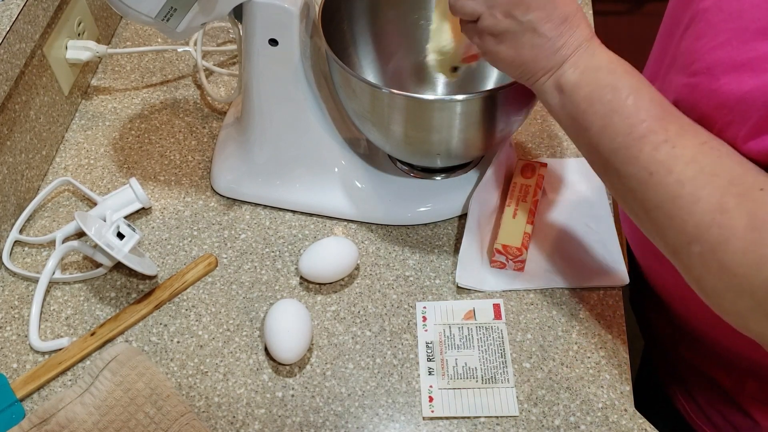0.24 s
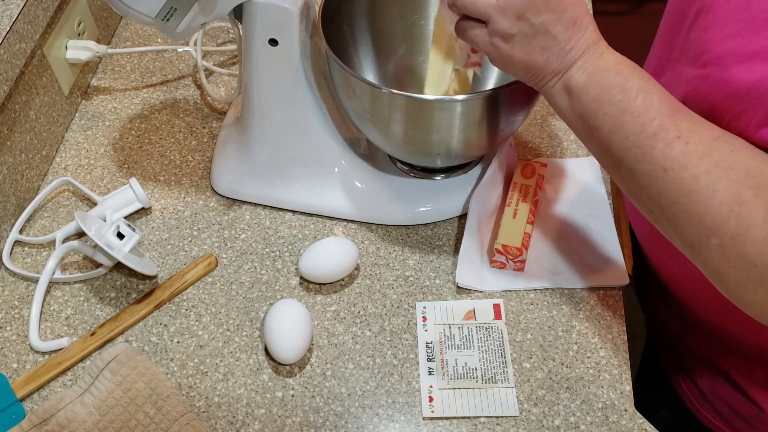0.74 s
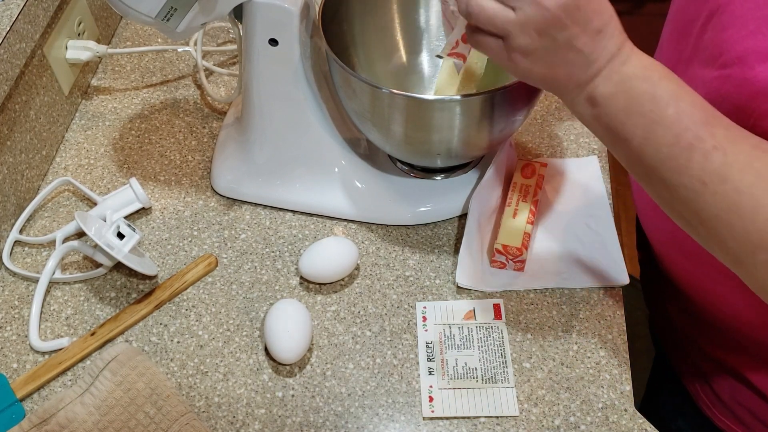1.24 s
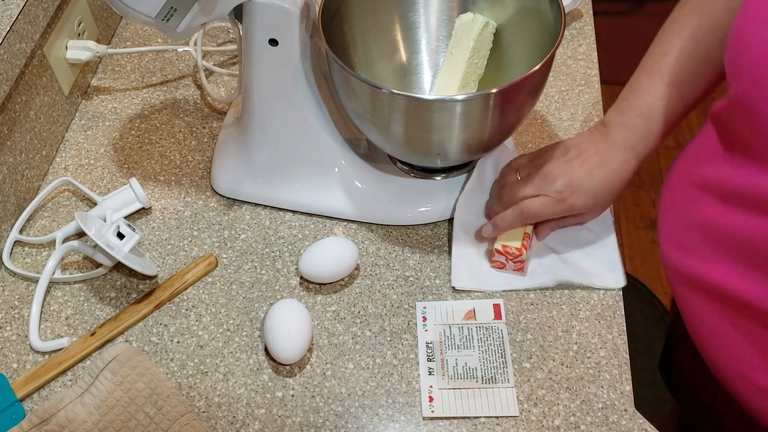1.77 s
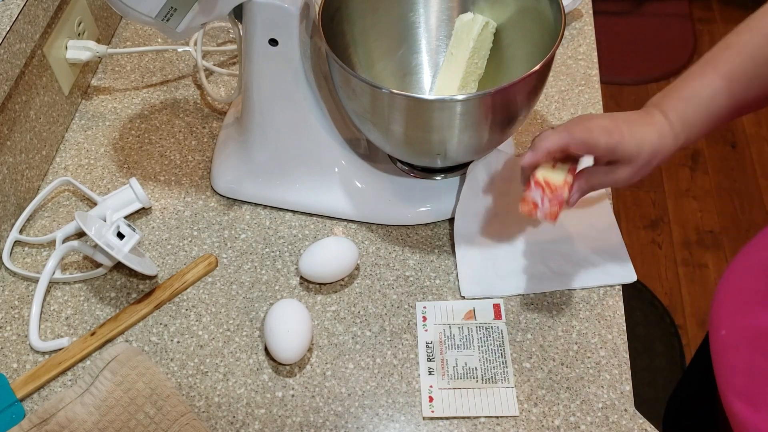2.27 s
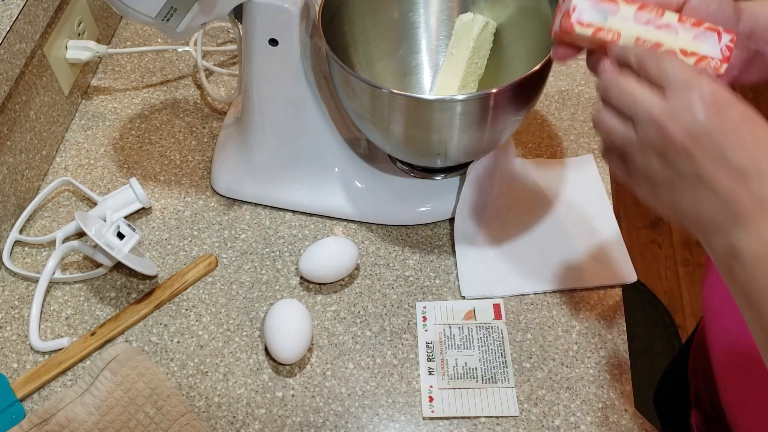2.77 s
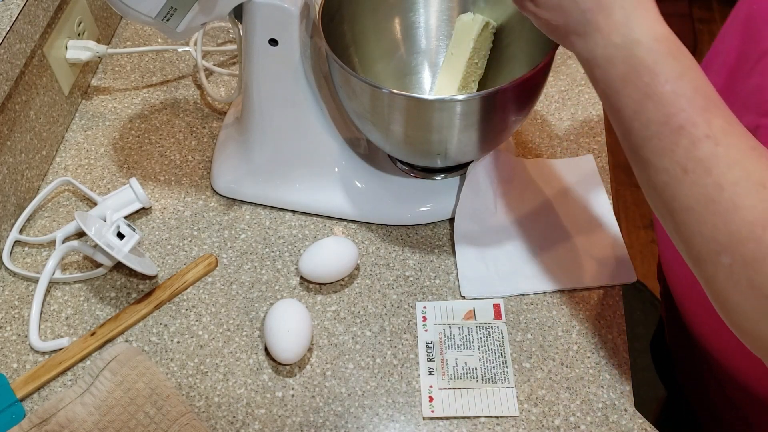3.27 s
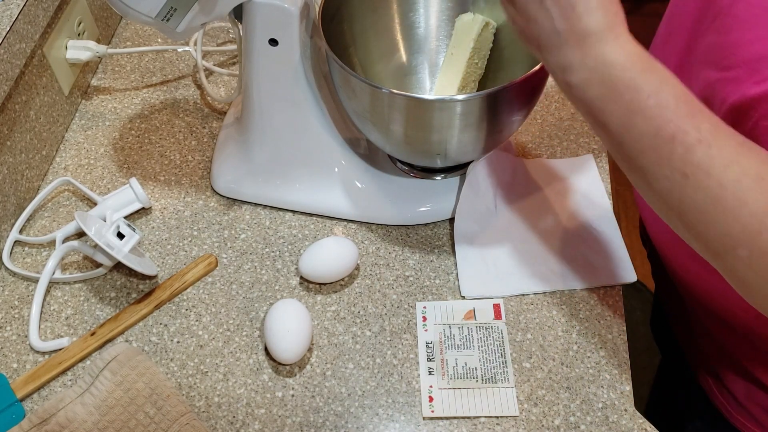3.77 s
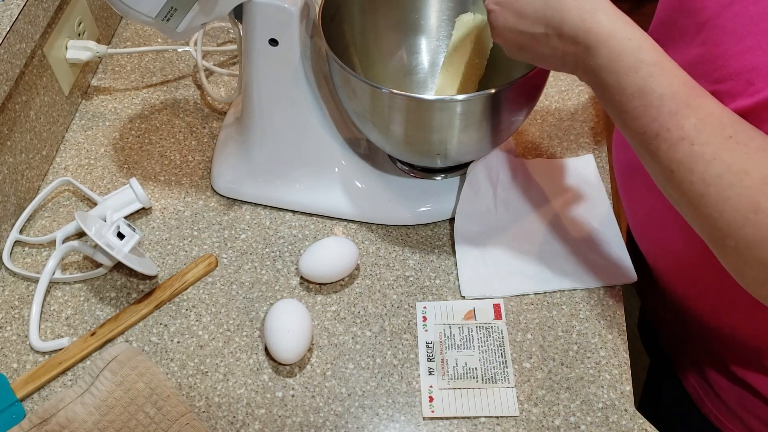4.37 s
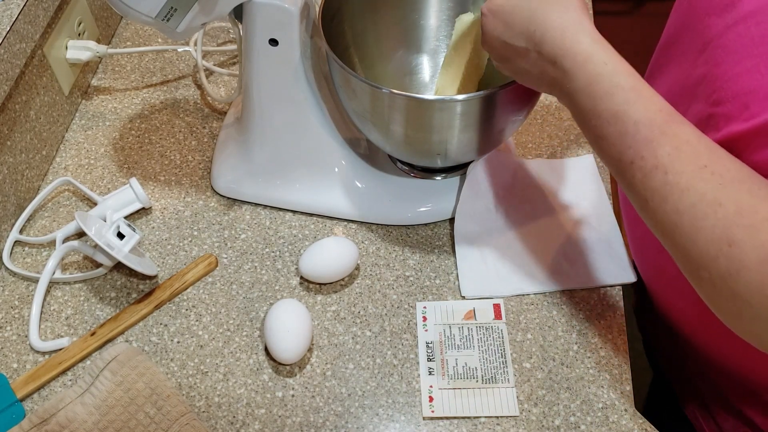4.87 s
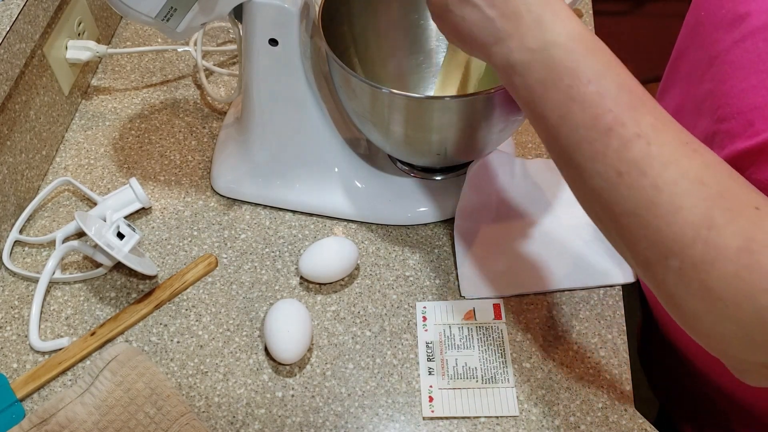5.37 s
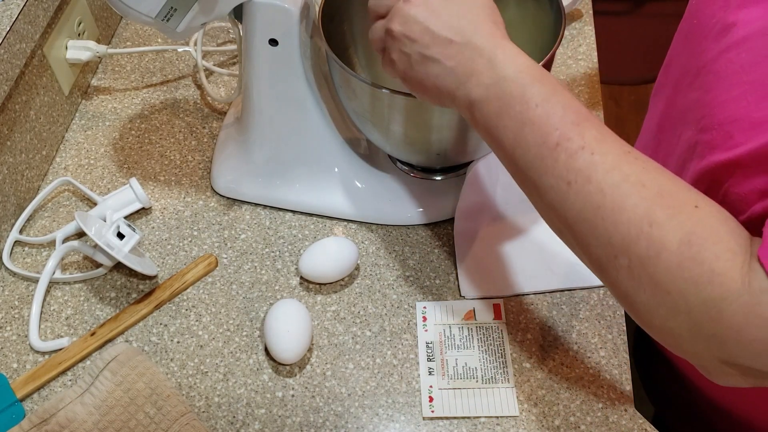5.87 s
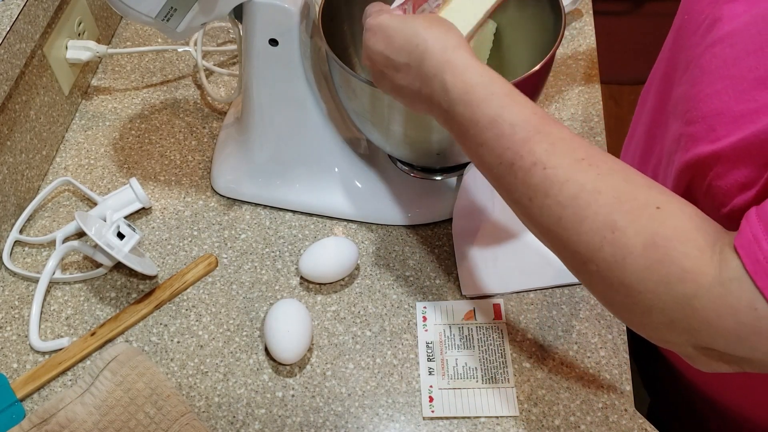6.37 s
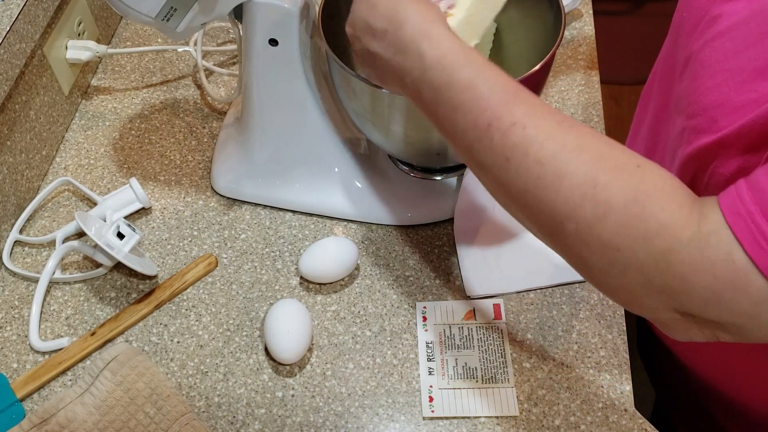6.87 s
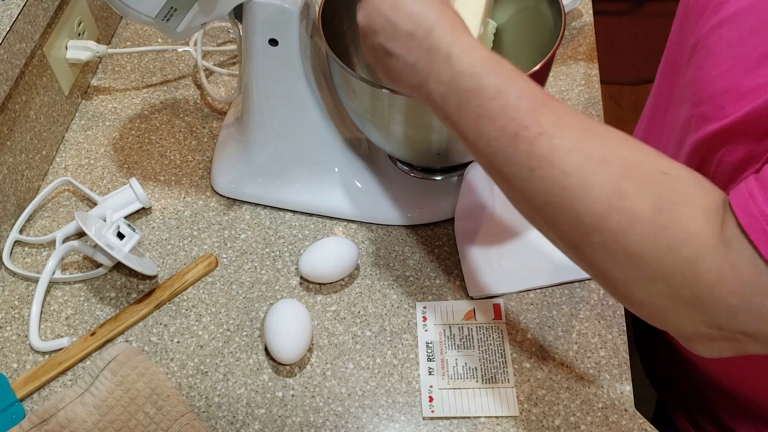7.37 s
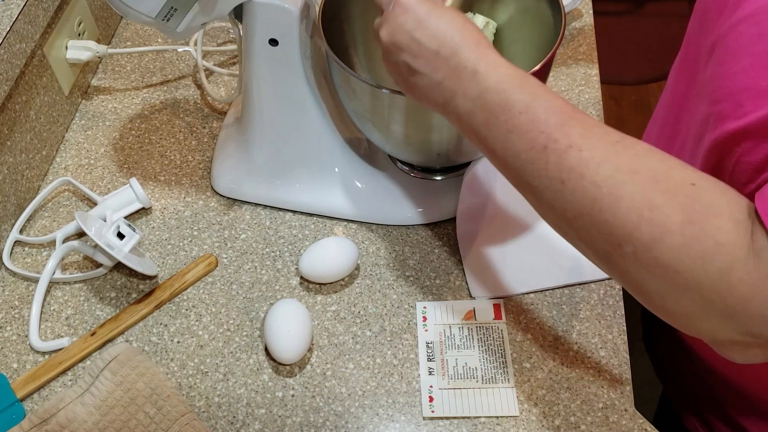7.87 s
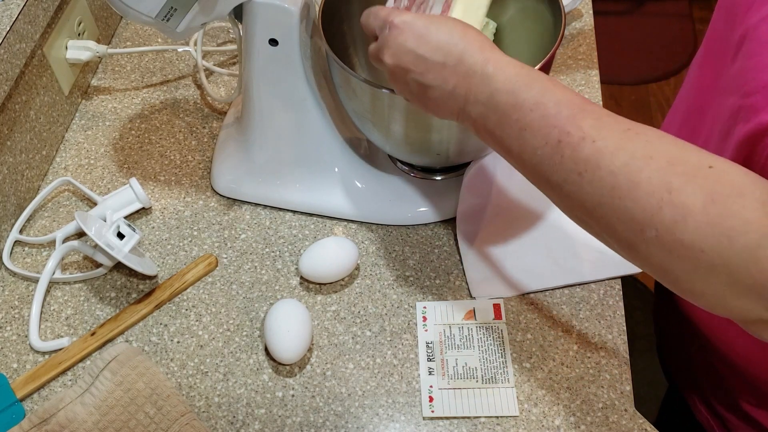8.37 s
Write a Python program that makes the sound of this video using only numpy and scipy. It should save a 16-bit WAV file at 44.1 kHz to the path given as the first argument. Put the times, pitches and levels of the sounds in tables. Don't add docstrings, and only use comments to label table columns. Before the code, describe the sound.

Stiff butter wrapper crackles in bursts, pauses, then snaps sharply again over a metal bowl, above faint fridge hum and room hiss.

```python
import sys
import numpy as np
from scipy import signal
from scipy.io import wavfile
from scipy.ndimage import uniform_filter1d

SR = 44100
rng = np.random.default_rng(int(sys.argv[2]) if len(sys.argv) > 2 else 0)


def gain_from_decibels(decibels):
    exponent = np.asarray(decibels, float) / 20
    return 10 ** exponent


def inscribe(sig):
    pcm = np.round(np.clip(np.atleast_2d(sig).T, -1, 1) * 32767)
    wavfile.write(sys.argv[1], SR, pcm.astype(np.int16))


N = 380583
EDGES_HZ = 22 * 2 ** np.arange(0, 10, .3)

# (frequency [Hz], correlation [-1..1])
LIKENESS = [(60, 0.76), (180, 0.98), (550, 0.62), (1650, 0.03), (4970, 0), (15000, -0.0)]
# (time [s], left-right [dB])
HAND_PAN = [
    (0, 2.5),
    (1.0, 2.5),
    (2.2, 0),
    (4.3, 1.5),
    (8.6, 1),
]


def in_time(rows):
    s, *columns = np.transpose(rows)
    return [np.interp(np.arange(N) / SR, s, c) for c in columns]


def at_time(rows, s):
    return np.interp(s, *np.transpose(rows))


def at_hz(points, hz):
    return np.interp(np.log(hz), np.log(np.array(points)[:, 0] + 1), np.array(points)[:, 1])


def rms_one(x):
    return x / np.sqrt(np.mean(x ** 2) + 1e-20)


def peak_one(x):
    return x / (np.max(np.abs(np.mean(x, axis=0))) + 1e-12)


def pan(left_right_db):
    return gain_from_decibels(left_right_db * np.array([[.5], [-.5]]))


def drift(rate_hz):
    r = np.exp(-80 * np.pi * rate_hz / SR)
    slow = signal.lfilter([1], [1, -2 * r, r * r], rng.standard_normal(N // 40 + 2002))[2000:]
    return np.interp(np.arange(N) / 40, np.arange(len(slow)), rms_one(slow))


def band(x, low_hz, high_hz, order=2):
    edges = [low_hz, min(high_hz, .45 * SR)]
    return signal.sosfilt(signal.butter(order, edges, "band", fs=SR, output="sos"), x)


def resonate(x, hz, width_hz):
    r = np.exp(-np.pi * width_hz / SR)
    zeros = np.array([1, 0, -1]) * (1 - r * r) / 2
    return signal.lfilter(zeros, [1, -2 * r * np.cos(2 * np.pi * hz / SR), r * r], x)


def resonate_twice(x, hz, width_hz):
    return resonate(resonate(x, hz, width_hz), hz, width_hz)


def spread(mid, side, hz):
    alike = np.clip(at_hz(LIKENESS, hz), -1, 1)
    return np.sqrt(1 + alike) * mid + np.sqrt(1 - alike) * side * [[1], [-1]]


def colour(mid_side, spectrum, low_hz, high_hz, patchy_db, tilted):
    # (frequency [Hz], left-right [dB])
    balance = [(60, 0.5), (180, -3), (550, 13), (1650, 4.5), (4970, 4.5), (15000, -5.5)]
    out = 0
    for k, (low, high) in enumerate(zip(EDGES_HZ, EDGES_HZ[1:])):
        hz = np.sqrt(low * high)
        if low_hz <= hz < high_hz:
            mid, side = band(mid_side[k % 2], low, high)
            gain = gain_from_decibels(at_hz(spectrum, hz) + patchy_db * drift(14.2))
            out = out + gain * spread(mid, side, hz) * pan(tilted * at_hz(balance, hz))
    return out / np.sqrt(np.mean(np.mean(out, axis=0) ** 2))


def room_tone():
    # (frequency [Hz], density [dB per Hz])
    air_spectrum = [(13, -50), (22, -17.5), (70, -7), (97, -4), (121, -3.5), (143, -6.5), (169, -16),
                    (255, -10), (550, -31), (1220, -36.5), (2950, -38), (5870, -47.5), (6730, -39),
                    (8390, -49.5), (15800, -38.5)]
    noise = rng.standard_normal((2, 2, N))
    return gain_from_decibels(-61.5) * colour(noise, air_spectrum, 26, 20000, patchy_db=3.0, tilted=0.44)


def refrigerator():
    # (time [s], level [dB])
    motor_level = [(0.0, -67.5), (1.68, -60.5), (2.6, -76), (5.38, -63.5), (5.84, -50), (6.73, -67),
                   (7.04, -60.5), (8.63, -63)]
    motor_db, = in_time(motor_level)
    t = np.arange(N) / SR
    beat_s, dip_s, depth = 1.08, 4.545, 0.22
    beat = 1 - depth * np.cos(2 * np.pi * (t - dip_s) / beat_s)
    hum_db = -49.5 + 0.46 * drift(2.7)
    hum = beat * gain_from_decibels(hum_db) * np.sin(2 * np.pi * 120.1 * t + .3 * drift(1.2))
    motor = gain_from_decibels(motor_db - 1.5) * rms_one(resonate_twice(rng.standard_normal(N), 76.8, 12))
    mains = gain_from_decibels(-67.5) * rms_one(resonate_twice(rng.standard_normal(N), 59.9, 6.5))
    return (hum + motor + mains) * pan(2.2)


def in_bowl(x, ring_db, pitch=1, scatter_db=np.zeros(6)):
    # (frequency [Hz], width [Hz], level [dB])
    air_modes = [(222, 360, -10), (342, 19, -1), (431, 33, -5.5), (496.8, 24, 8), (791, 88, -8.5),
                 (1154, 39, -4.5)]
    ring = 0
    for k, (hz, width_hz, db) in enumerate(air_modes):
        ring = ring + (-1) ** k * gain_from_decibels(ring_db + db + scatter_db[k]) * resonate(x, pitch * hz, width_hz)
    return x + ring


def pulls():
    # (peak time [s], 20 dB swell [s], level [dB], brightness [dB], weight in bowl [dB])
    first = [(.005, 20, -59, -5, -1), (0.198, 0.28, -53, -8, -6), (.382, 0.5, -62, -7, 6),
             (.673, -5, -85, 19, 3), (.723, 0.06, -48.5, -7.5, -0.5), (0.871, -1.2, -60.5, -5.5, 1.5),
             (1.249, -1.8, -74.5, 1.5, 5.5), (1.476, .004, -74, -10, 15), (1.54, .03, -77, -8, 14),
             (1.79, 0.5, -86.5, 12, 7), (2.08, 0.35, -78, 5, 3.5)]
    lift = [
        (2.226, .003, -48, -6, -7),
        (2.27, .022, -53, -4, -8),
        (2.33, .03, -54, -4, -11),
        (3.132, .004, -96, 23, 8),
        (3.25, .025, -92, 27, 6),
        (3.425, .006, -62, -6, -9),
        (3.45, .03, -64, 15, -15),
        (3.577, .02, -56, -2, -18),
        (3.766, .12, -54.5, 0, -8),
        (3.909, .5, -56.5, -4, -8),
    ]
    unfold = [(4.2, 0.54, -66, 1, -23), (4.301, 0.3753, -50.5, 0, -7), (4.501, -0.15, -55.5, -8, -13),
              (4.62, 0.6, -65.5, -3, -7), (4.798, 0.08, -54.5, 3, -7.5), (4.965, 0.16, -42.5, -7, -12),
              (5.154, 0.01, -54, 2.5, -9), (5.37, 0, -51.5, -5, -7), (5.6, 0.38, -59.5, 3, -11),
              (5.76, 0.5, -78, 8.5, 7.5)]
    peel = [(5.914, 0, -53, -21, -2), (6.054, -0.06, -51.5, -1, -9), (6.287, 0.16, -46.5, -2, -6.5),
            (6.46, 1.4, -66.5, 2, -16), (6.64, 0.2, -55.5, -3.5, -0.5), (6.78, 0, -70, 0.5, 4),
            (6.943, 0.07, -46.5, -5.5, -6), (7.049, 0.02, -58, -14, -7), (7.16, 0.34, -52.5, -3, -1),
            (7.276, 0.66, -56, -2.5, -2.5), (7.45, 2, -74.5, -12, 10), (7.56, 0.3, -60.5, -2, -21),
            (7.699, 0.38, -61, -6.5, 4.5), (7.776, 0.11, -52, -2.5, 1), (7.915, 0.12, -48, -9, -3),
            (8.244, 0.06, -49.5, -3, -2.5), (8.406, 0.38, -53.5, -9, -4.5), (8.58, 0.53, -55, -1, -1)]
    settle_rates = [97, 132, 144, 190]
    s, swell_s, db, bright_db, weight_db = np.transpose(first + lift + unfold + peel)[:, :, None]
    steps = np.arange(0, N + 64, 64)
    age = steps / SR - s
    swell_s = np.maximum(swell_s, .003)
    hiss_db = db + 1.55 * bright_db - 2.5
    levels = []
    for peak_db, settle in zip([db + weight_db, db, db + bright_db, hiss_db], settle_rates):
        shape_db = np.where(age < 0, 20 * age / swell_s, -settle * age)
        power = np.sum(gain_from_decibels(np.maximum(peak_db + shape_db, -130)) ** 2, axis=0)
        levels.append(np.interp(np.arange(N), steps, 10 * np.log10(power)))
    return levels


def crackle(body_db, rustle_db, crisp_db):
    pops_per_s = 600. * gain_from_decibels(5 * np.minimum(drift(20), 1)) * np.clip((rustle_db + 71) / 12, 0, 1)
    born = rng.random(N) < pops_per_s / SR
    sizes = born * gain_from_decibels(2.0 * np.minimum(rng.exponential(1, N), 3)) * rng.choice([-1, 1], N)
    ports = gain_from_decibels(3.4 * np.clip(rng.standard_normal(N), -1, 1) * np.array([[1], [-1]]))
    rough = rng.standard_normal(N)
    pitches_hz, dealt, out = np.geomspace(450, 7000, 12), rng.integers(0, 12, N), 0
    for k, hz in enumerate(pitches_hz):
        level_db = body_db if hz < 1000 else rustle_db if hz < 3500 else crisp_db
        puffs = signal.lfilter([1], [1, -.98], sizes * ports * (dealt == k) + 1e-18)
        out = out + gain_from_decibels(level_db) * rms_one(band(rough * puffs, 0.67 * hz, 1.48 * hz))
    return out


def rustle():
    # (frequency [Hz], density [dB per Hz])
    paper_spectrum = [(120, -40), (200, -6), (386, -16), (481, -6), (668, -15.5), (760, -7), (1040, -12.5),
                      (1360, -11.5), (4080, -15), (6450, -12.5), (8800, -15), (15800, -8)]
    body_db, rustle_db, crisp_db, hiss_db = pulls()
    grains = rng.standard_normal((2, 2, N)) * gain_from_decibels(2.73 * drift(50))
    flicker_db = 3.0
    body = in_bowl(colour(grains, paper_spectrum, 220, 1250, flicker_db, tilted=0.29), ring_db=-5.0)
    sheet = colour(grains, paper_spectrum, 1250, 3500, flicker_db, tilted=0.56)
    crisp = colour(grains, paper_spectrum, 3500, 7800, flicker_db, tilted=0.95)
    hiss = colour(grains, paper_spectrum, 7800, 20000, flicker_db, tilted=0.8)
    friction = gain_from_decibels(body_db - 4.0) * body + gain_from_decibels(rustle_db - 6.0) * sheet
    friction = friction + gain_from_decibels(crisp_db - 2.5) * crisp + gain_from_decibels(hiss_db + 1.5) * hiss
    return friction + gain_from_decibels(-18) * crackle(body_db, rustle_db, crisp_db)


def across_bowl(x):
    # (frequency [Hz], width [Hz], level [dB]); empty bowl
    empty_modes = [(1090, 80, 5), (1750, 230, 2), (2260, 150, 2.5), (2700, 52, -4)]
    full_modes = [(1266, 41, -9), (1980, 120, -8.5), (2850, 50, -7)]
    t = np.arange(N) / SR
    empty_until_s, over_bowl_from_s = 1.1, 4.2
    in_empty = np.clip(10 * (empty_until_s - t), 0, 1)
    in_full = np.clip(10 * (t - over_bowl_from_s), 0, 1)
    out = x
    for share, modes in [(in_empty, empty_modes), (in_full, full_modes)]:
        for hz, width_hz, db in modes:
            out = out + gain_from_decibels(db) * resonate(x * share + 1e-18, hz, width_hz)
    return out


def snaps():
    # (time [s], peak [dB], crease pitch [Hz], bowl boom [dB rel], treble [dB rel])
    first = [(0.0602, -35, 4130, -8.5, -26), (0.1807, -29.5, 1720, -6, -11),
             (0.1932, -34.5, 1610, -33, -22), (0.3062, -30.5, 1750, -27, -12),
             (0.368, -27.5, 1730, -10, -10), (0.3775, -25, 1810, -59.5, -6.5),
             (0.4581, -38.5, 2320, -12, -23), (0.5238, -45, 1020, 1.5, -17), (0.5827, -36, 1750, -21, -15),
             (0.614, -23.5, 5830, -18, -8.5), (0.7061, -26, 2940, -9.5, -8), (0.7147, -25.5, 4450, -13, -4),
             (0.7377, -31, 2230, -14, -20.5), (0.7575, -40, 1580, -5, -27.5), (0.887, -43.5, 5700, -9, -6),
             (0.9259, -43, 1700, -25, -12), (0.9491, -44, 1650, -9, -11)]
    lift = [
        (2.2258, -31.5, 6560, -26, -0.5),
        (2.245, -34.5, 3620, -24, 2),
        (2.268, -36.5, 2000, -16, 12.5),
        (2.325, -28, 3200, -30, -3.5),
        (3.5681, -20, 7100, -32, 4),
        (3.6486, -37, 888, -27, -1),
        (3.69, -29.5, 5470, -35, -6.5),
        (3.755, -27.5, 2700, -42, -40),
        (3.8467, -38, 2850, -22, -24),
    ]
    unfold = [(4.2813, -30, 1440, -8, -21), (4.453, -24.5, 4540, -35.5, -11),
              (4.4885, -28.5, 2870, -12.5, -6), (4.7155, -39, 1589, -20, -21.5), (4.772, -32, 7300, -18, 7),
              (4.8012, -28.5, 3220, -15, -21), (4.8129, -26, 5050, -18, -1), (4.8415, -29, 1520, -9, -12),
              (4.886, -25.5, 2730, -15, -7), (4.935, -23.5, 1400, -12, -11), (4.9576, -26.5, 4900, -3, -5),
              (5.0094, -23.5, 2260, -21, -15), (5.039, -36.5, 1310, 2.5, -18.5),
              (5.149, -25, 1380, -20, -5.5), (5.359, -17.5, 2600, -20.5, -1),
              (5.372, -22, 5740, -17.5, -12), (5.525, -34.5, 3260, -33, 6), (5.5826, -31.5, 5900, -41, -7),
              (5.633, -34.5, 4700, -23, 3)]
    peel = [(5.889, -40.5, 1000, -5, -28), (5.9087, -40, 1740, -3.5, -11), (6.0418, -32.5, 2940, -17, -8),
            (6.19, -32.5, 3380, -11, -27), (6.2673, -22.5, 1960, -12, -3), (6.563, -37, 1410, -2.5, -15.5),
            (6.6095, -30.5, 1330, -11.5, -6), (6.636, -25, 1370, -4.5, -11), (6.649, -28, 2980, -37, -6.5),
            (6.7303, -31, 2450, -7, -10), (6.75, -33, 1130, -4, -23), (6.8462, -31.5, 2770, -6.5, -13.5),
            (6.9339, -24, 1490, -17.5, -13), (6.9513, -22, 5000, -16, 2), (7.0452, -19.5, 1460, -9, -3),
            (7.1158, -20, 3460, -15, -20), (7.1323, -26, 1180, -26, -5.5), (7.1956, -22.5, 7200, -12, -4.5),
            (7.2018, -28, 3160, -34, -2), (7.2626, -19.5, 5920, -48, -8), (7.2722, -36, 6160, -34, -22),
            (7.354, -26.5, 3620, -11, -5.5)]
    push = [(7.418, -43.5, 1480, -3, -14), (7.5383, -34, 2540, -27, -12), (7.5938, -37.5, 1850, -18, -10),
            (7.752, -42, 1400, -19, -17), (7.7725, -21, 3050, -9.5, -3.5), (7.9062, -18, 6070, -21.5, -2.5),
            (8.164, -41.5, 1490, -6.5, -23), (8.18, -37.5, 4900, -12, -11),
            (8.2417, -28.5, 1960, -15, -4.5), (8.3055, -27.5, 1370, -4, -10),
            (8.3857, -26, 1720, -18, -6.5), (8.4135, -29, 3730, -10.5, -3.5),
            (8.4269, -31.5, 2060, -11, -7), (8.4902, -37.5, 4670, -15, -6),
            (8.5261, -31.5, 2850, -7.5, -18), (8.537, -34.5, 2820, -11, -13)]
    crisp_times = [3.568, 4.453, 4.772, 4.813, 5.359, 5.372, 5.583, 5.633, 6.951, 7.116, 7.132, 7.354,
                   7.772, 7.906]
    # (time [s], pitch factor)
    bowl_pitch = [(0, 1.05), (4.3, 0.98), (4.95, 0.98), (5.4, 1.01), (6.6, 1.007), (7.1, 1.001),
                  (7.8, 0.97), (8.63, 1.01)]
    rows = first + lift + unfold + peel + push
    length, lead = 4096, 500
    out = np.zeros((2, N + length))
    t = (np.arange(length) - lead) / SR
    draws, chances = rng.standard_normal((len(rows), 3, length)), rng.random((len(rows), 3))
    for (s, db, hz, boom_db, treble_db), draw, (span, creak, place) in zip(rows, draws, chances):
        crisp = np.min(np.abs(np.array(crisp_times) - s)) < .004
        creak, span = (creak / 4, span / 2) if crisp else (1 - creak / 4, span)
        before = (.12 + .6 * creak ** 3) * np.exp(t / 0.0014)
        burst = np.where(t < 0, before, np.exp(-t / (0.0016 + 0.002 * span)))
        slips = (draw[0] + 0.9 * draw[1:]) * burst
        slips[[0, 1], lead + np.array([0, round(8.0 * span)])] += 14.1 * (1 - creak)
        panel = band(slips, np.clip(0.45 * hz, 700, 4000), 5880)
        panel = panel + gain_from_decibels(4.5) * resonate_twice(slips, hz, 0.42 * hz)
        boom = in_bowl(draw[0] * burst, ring_db=22, pitch=at_time(bowl_pitch, s), scatter_db=4 * draw[1])
        boom = band(boom, 138, 1530) * np.ones((2, 1))
        treble = band(slips, 8950, 15930) * pan(-7)
        sound = peak_one(panel) * pan(2.4) + gain_from_decibels(boom_db) * peak_one(boom)
        sound = sound + gain_from_decibels(treble_db) * peak_one(treble)
        pan_db = at_time(HAND_PAN, s) + 1.5 * (2 * place - 1)
        at = max(round(s * SR) - lead, 0)
        out[:, at:at + length] += gain_from_decibels(db - 1.5) * sound * pan(pan_db)
    return out[:, :N]


def ticks():
    # (time [s], peak [dB], pitch [Hz], treble [dB rel]); first stick and lift
    early = [(0.079, -39, 1360, -34), (0.128, -51, 1180, -31), (0.186, -28.5, 1040, -30),
             (0.209, -30, 1540, -27), (0.236, -33.5, 930, -22), (0.274, -34.5, 867, -14),
             (0.297, -38, 1750, -27), (0.322, -39, 1560, -33), (0.546, -43, 1090, -29),
             (0.659, -47, 1100, -19), (0.872, -47, 1680, -24), (2.233, -24.5, 960, -4),
             (2.312, -33, 3380, -18), (3.374, -53, 6340, -4), (3.451, -36, 6980, 10),
             (3.502, -37, 6710, -20), (3.545, -45, 3500, -12), (3.697, -33, 6100, -22),
             (3.712, -40, 3080, -22), (3.761, -29.5, 864, -13), (3.794, -38, 3110, -13),
             (3.854, -37, 2930, -28), (3.878, -34, 1190, -17), (3.928, -39.5, 3520, -21),
             (4.271, -33, 746, -15), (4.310, -30.5, 5400, -3)]
    late = [(4.508, -34.5, 4820, -24), (4.514, -36, 4570, -4), (4.626, -43, 3070, -22),
            (4.754, -43, 4850, -6), (4.974, -28, 3470, -24), (4.985, -31, 2700, -35.5),
            (5.121, -44, 1170, -10), (5.564, -43, 6270, -13), (5.755, -46, 6800, -10),
            (5.921, -46, 1140, -33), (6.045, -33, 3470, -24), (6.182, -32.5, 4040, -12),
            (6.224, -39, 2090, -25), (6.312, -29.5, 6300, -17), (6.388, -40, 1650, -18),
            (6.442, -47, 1330, -21), (6.509, -38.5, 5050, -22), (6.544, -41.5, 1410, -34),
            (6.572, -34.5, 720, -11), (6.925, -32.5, 6200, -8), (7.17, -32, 1830, -19),
            (7.186, -26, 1200, -10), (7.28, -32, 6490, -23), (7.325, -32, 778, -8),
            (7.493, -39.5, 2580, -21), (7.611, -40.5, 1960, -27), (7.642, -39, 4130, -29),
            (7.67, -40, 1100, -25), (7.7, -46, 1320, -18), (7.807, -46, 2780, -22),
            (8.05, -41.5, 1600, -28), (8.233, -35, 2060, -16), (8.257, -39, 1630, -17),
            (8.289, -29.5, 1980, -26), (8.315, -31.5, 1220, -27), (8.394, -23, 1670, -30)]
    near_snaps = [(0.687, -35, 6800, -12), (3.132, -50, 6500, 2), (5.137, -36, 5600, -11),
                  (5.352, -28, 1800, -13), (7.034, -29, 2403, -15), (7.040, -20.5, 1241, -22),
                  (7.052, -25.5, 2095, -13), (7.758, -34.5, 1500, -20), (8.348, -40, 3500, -15),
                  (8.507, -35.5, 2900, -17)]
    rows, length = early + late + near_snaps, 1024
    decay_s, rel_width = 0.0037, 0.23
    out, fading = np.zeros((2, N + length)), np.exp(-np.arange(length) / SR / decay_s)
    for (s, db, hz, treble_db), draw in zip(rows, rng.standard_normal((len(rows), 3, length))):
        slips = (draw[0] + 0.98 * draw[1:]) * fading
        panel = resonate_twice(slips, hz, rel_width * hz) + gain_from_decibels(-11.5) * band(slips, 830, 7100)
        treble = band(slips, 5400, 15870) * pan(-7)
        sound = peak_one(panel) + gain_from_decibels(treble_db) * peak_one(treble)
        at = round(s * SR)
        out[:, at:at + length] += gain_from_decibels(db - 5.5) * sound * pan(at_time(HAND_PAN, s))
    return out[:, :N]


def floor_echo(x):
    # (time [s], delay [ms], strength [0-1])
    echo_path = [
        (0, 1.74, 0),
        (1.2, 1.98, 0.54),
        (2, 1.4, 0),
        (4, 1.38, 0.16),
        (8.63, 1.57, 0.22),
    ]
    delay_ms, strength = in_time(echo_path)
    late = np.arange(N) - delay_ms * SR / 1000
    dulled = band(x, 1200, 2890, order=1)
    return x + strength * np.array([np.interp(late, np.arange(N), side) for side in dulled])


def kitchen(x):
    # (frequency [Hz], t60 [s])
    decay = [(300, 0.5), (1500, 0.43), (6000, 0.38), (16000, 0.25)]
    t = np.arange(SR // 2) / SR
    noise = rng.standard_normal((2, len(t))) * np.clip((t - .003) / 0.00057, 0, 1)
    tail = 0
    for low, high in zip(EDGES_HZ[9:], EDGES_HZ[10:]):
        hz = np.sqrt(low * high)
        mid, side = band(noise, low, high) * gain_from_decibels(-60 * t / at_hz(decay, hz))
        tail = tail + spread(mid, side, hz)
    return signal.fftconvolve(x, rms_one(tail) / np.sqrt(len(t)), axes=1)[:, :N]


def slides():
    # (start [s], end [s], level [dB], pitch [Hz], width [Hz])
    strokes = [(1.963, 2.196, -73.5, 1740, 540), (2.63, 2.95, -73.5, 12200, 5000),
               (5.745, 5.78, -56.5, 7000, 1500), (3.416, 3.648, -64.5, 1490, 760),
               (3.636, 3.82, -71, 840, 350), (4.15, 4.284, -58.5, 2670, 1100),
               (4.175, 4.38, -57, 4160, 1200), (5.148, 5.305, -65.5, 1840, 630),
               (5.871, 5.996, -57.5, 870, 740), (6.044, 6.18, -59, 3000, 2000), (7.42, 7.47, -53, 416, 110),
               (8.2, 8.5, -59, 280, 130), (3.127, 3.22, -69, 6700, 1300), (3.232, 3.3, -57, 6600, 2100),
               (7.762, 7.785, -47, 490, 60), (7.478, 7.72, -66.5, 6400, 1700),
               (2.238, 2.372, -58, 800, 220), (5.894, 6.033, -67.5, 3500, 1700),
               (0.66, 0.99, -74, 3000, 3000), (1.74, 1.9, -78, 6200, 1490), (1.25, 1.7, -82, 6700, 1100),
               (4.3, 3.92, -58, 14500, 3500), (2.62, 3, -81, 6970, 1500)]
    fade_s, release_s = 0.013, 0.078
    out, noise = np.zeros((2, N)), rng.standard_normal((3, N)) * gain_from_decibels(1.8 * drift(37))
    for start, end, db, hz, width_hz in strokes:
        span = slice(round((start - .1) * SR), round((end + .1) * SR))
        t = np.arange(N)[span] / SR
        ramp = np.minimum((t - start) / fade_s, (end - t) / release_s)
        hold = np.clip(ramp + .5, 0, 1) ** 2
        rubbed = noise[0, span] + 0.69 * noise[1:, span]
        out[:, span] += gain_from_decibels(db) * hold * rms_one(resonate_twice(rubbed, hz, width_hz))
    return out


def thuds():
    # (time [s], peak [dB], pitch [Hz], t60 [s])
    blows = [
        (0.984, -43.5, 50.5, 0.34),
        (1.491, -46.5, 97, 0.27),
    ]
    out, t = np.zeros(N), np.arange(N) / SR
    for s, db, hz, t60_s in blows:
        age = np.maximum(t - s, 0)
        swell = 1 - np.exp(-age / 0.0078)
        out += gain_from_decibels(db - 60 * age / t60_s) * swell * np.sin(2 * np.pi * hz * age)
    return out


def scene():
    sheet = rustle() * pan(in_time(HAND_PAN)[0])
    cracks = snaps() + ticks()
    cracks = cracks - 0.59 * resonate(cracks, 8630, 1350)
    paper = across_bowl(floor_echo(cracks + gain_from_decibels(-7.5) * kitchen(cracks) + sheet))
    return paper + slides() + thuds() + refrigerator() + room_tone()


def top_cut(x):
    return signal.sosfilt(signal.butter(12, 16990, fs=SR, output="sos"), x)


def record(dry):
    cutoff_hz, top_hz = 15900, 16750
    low_pass = signal.ellip(10, .5, 70, cutoff_hz, fs=SR, output="sos")
    top_pass = signal.ellip(8, .5, 70, [cutoff_hz, top_hz], "band", fs=SR, output="sos")
    top = signal.sosfilt(top_pass, dry)
    power = np.mean(top ** 2, axis=0)
    sudden = uniform_filter1d(power, size=256) > 6.5 * uniform_filter1d(power, size=4096)
    gate = uniform_filter1d(1. * sudden, size=128)
    mix = signal.sosfilt(low_pass, dry) + gain_from_decibels(-14.5) * top * gate
    return top_cut(mix)


dry = scene()
out = record(dry)
inscribe(out)
```